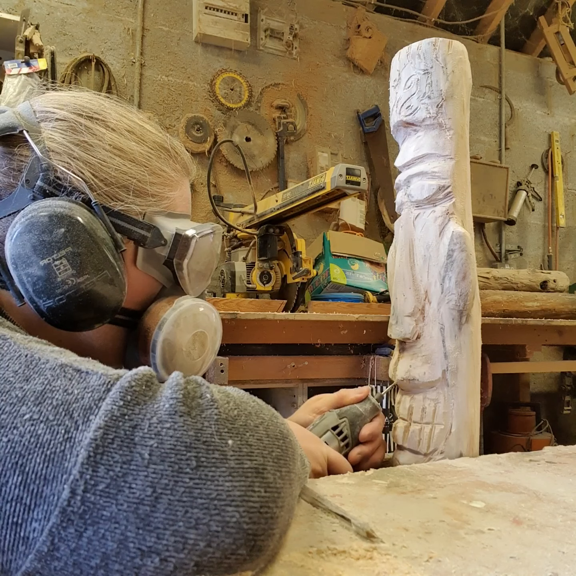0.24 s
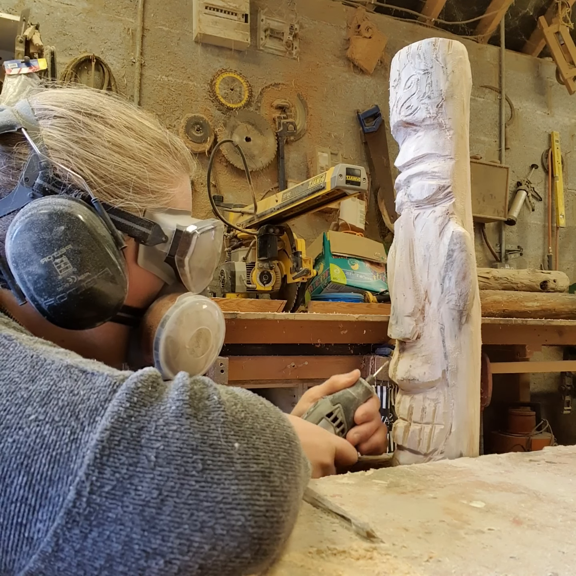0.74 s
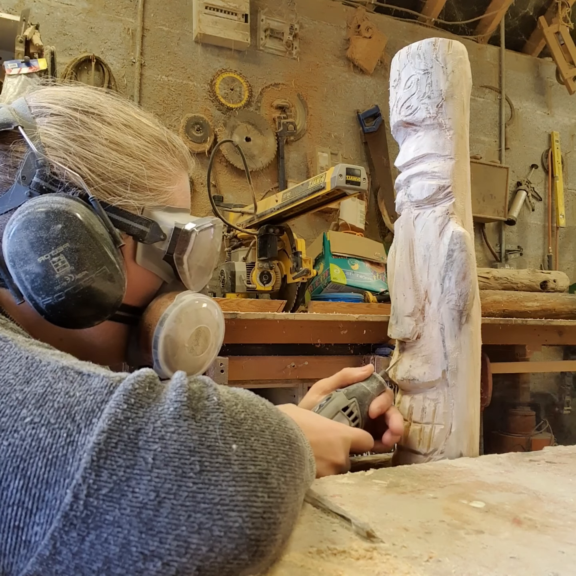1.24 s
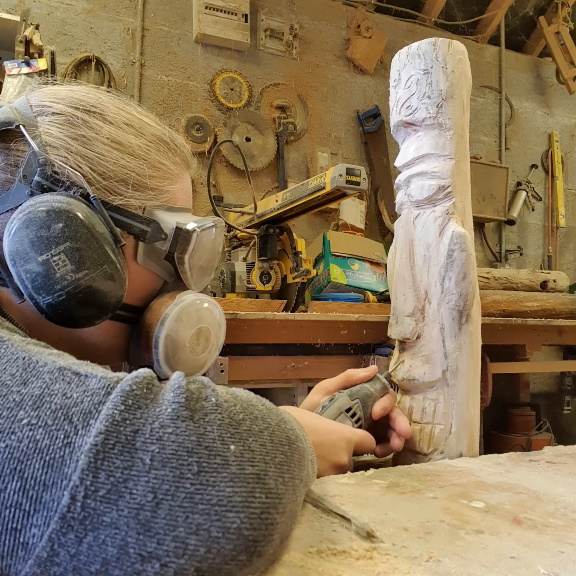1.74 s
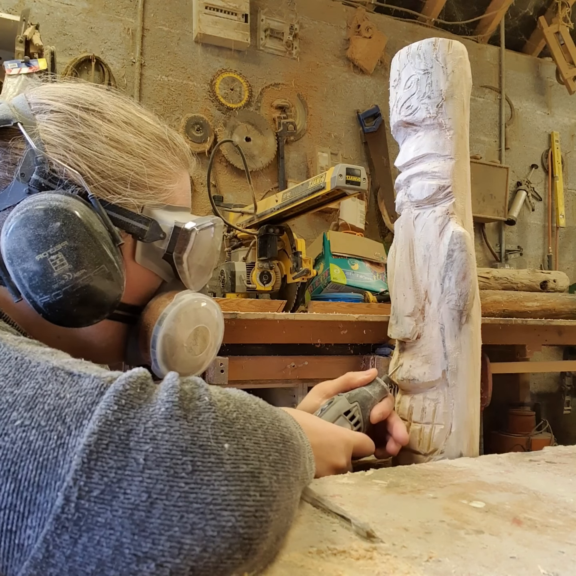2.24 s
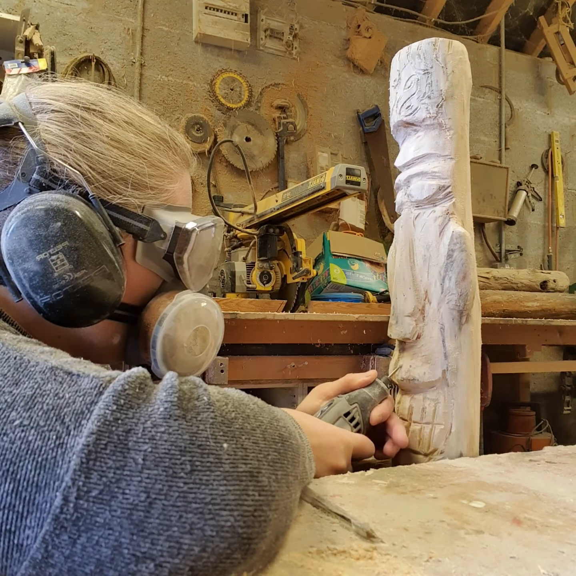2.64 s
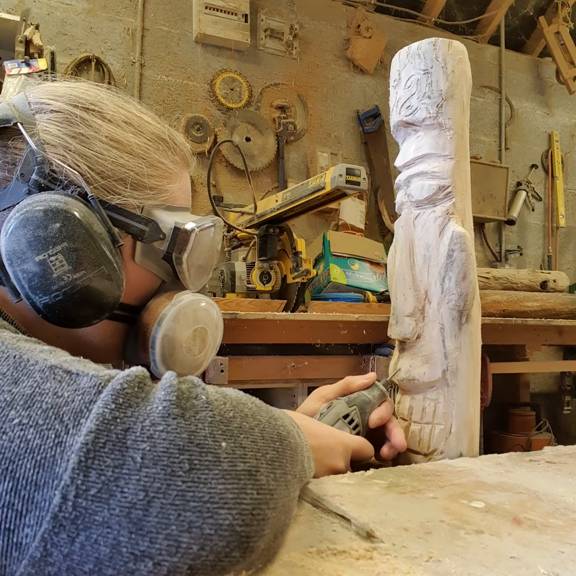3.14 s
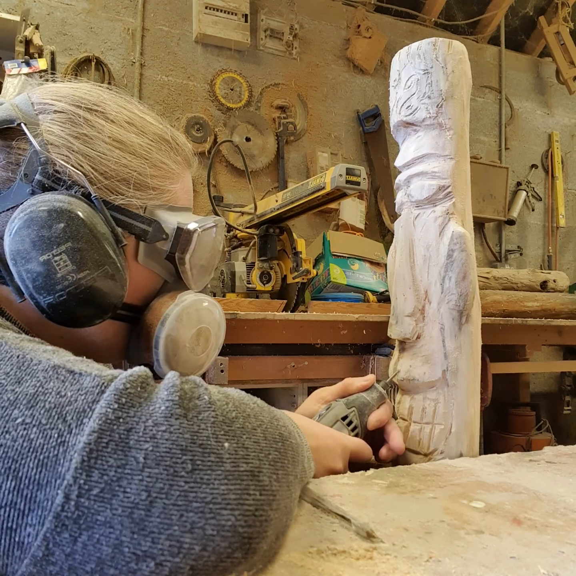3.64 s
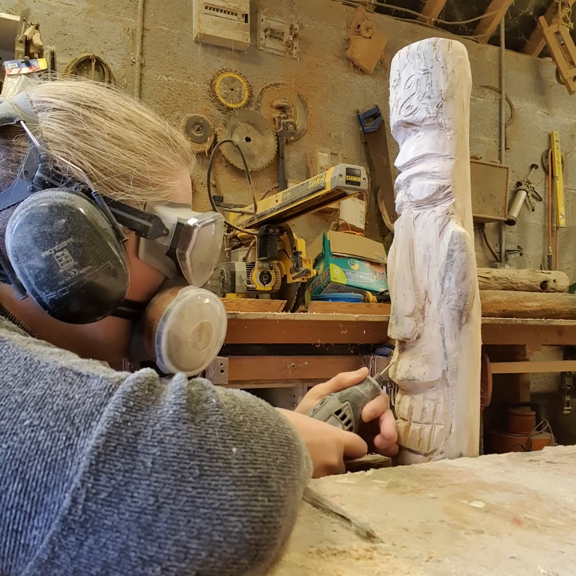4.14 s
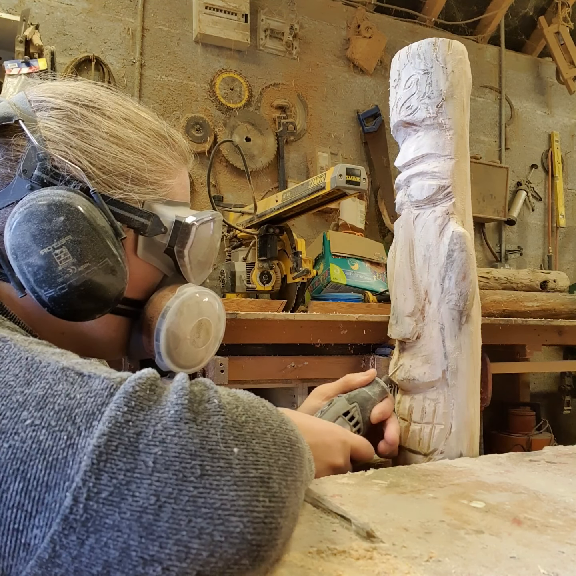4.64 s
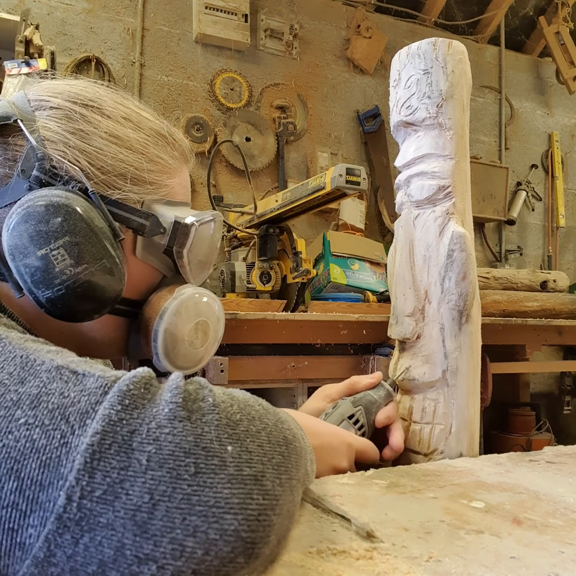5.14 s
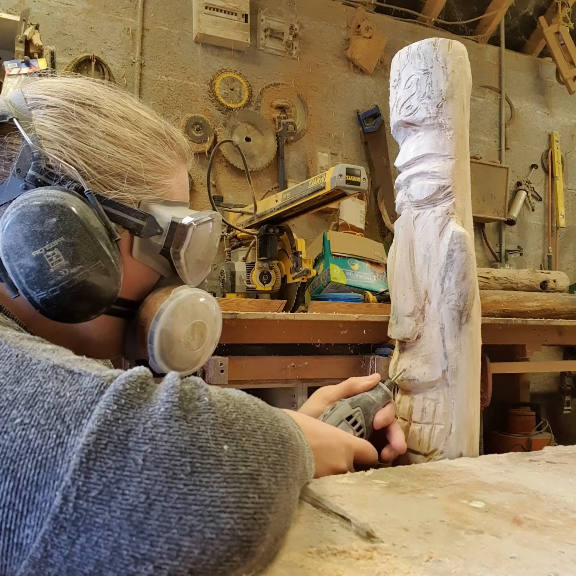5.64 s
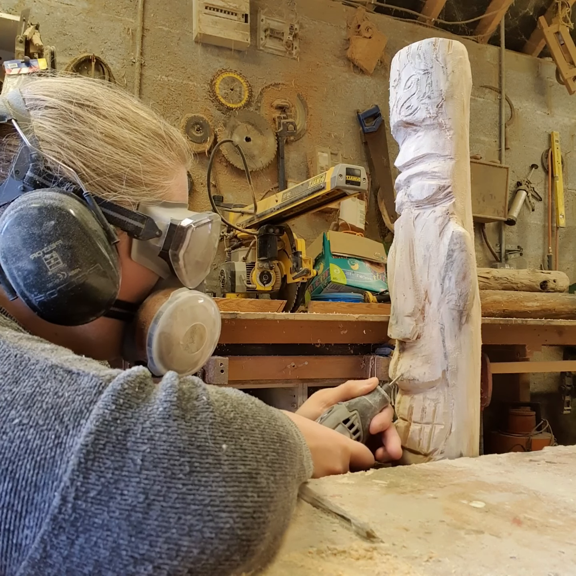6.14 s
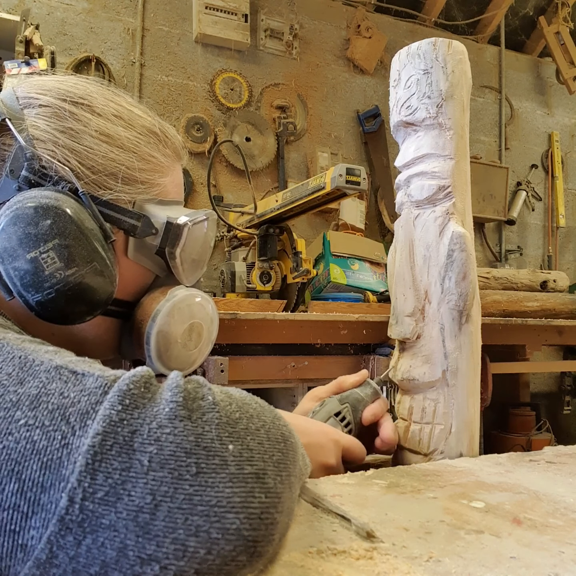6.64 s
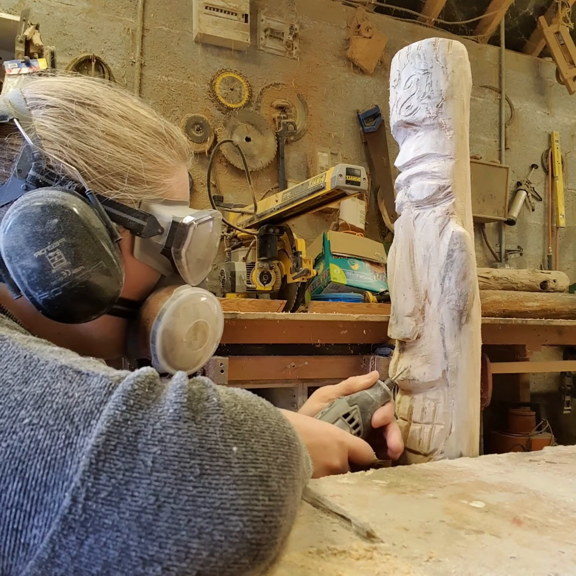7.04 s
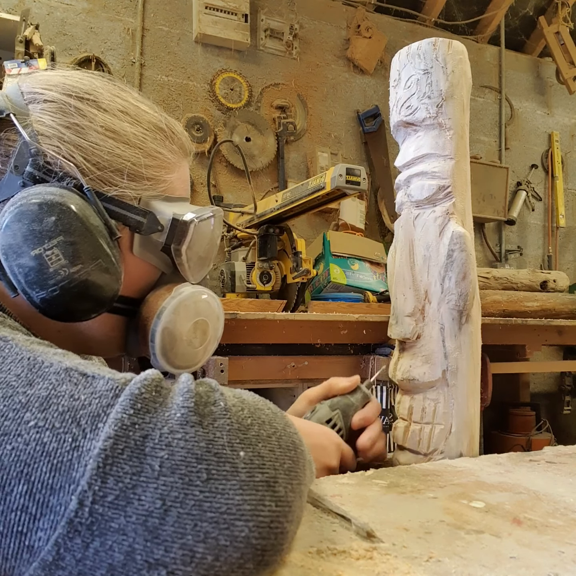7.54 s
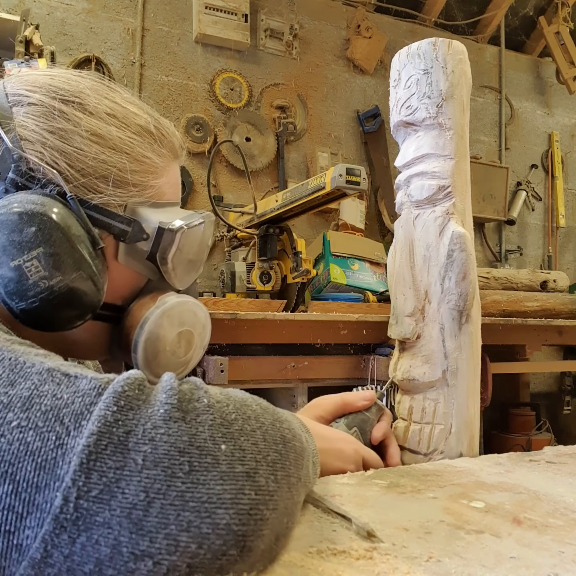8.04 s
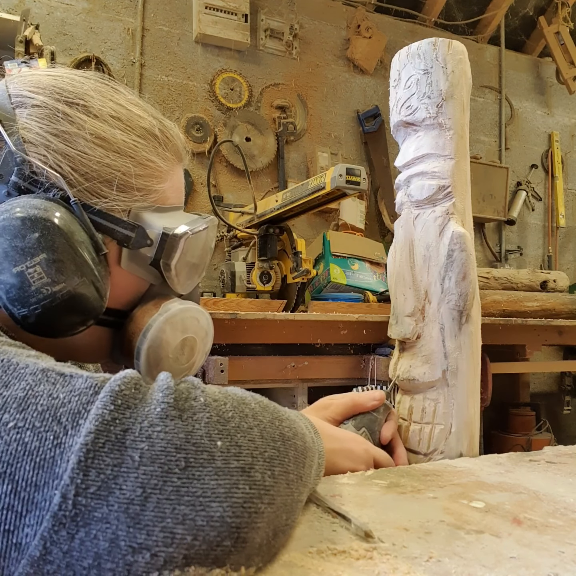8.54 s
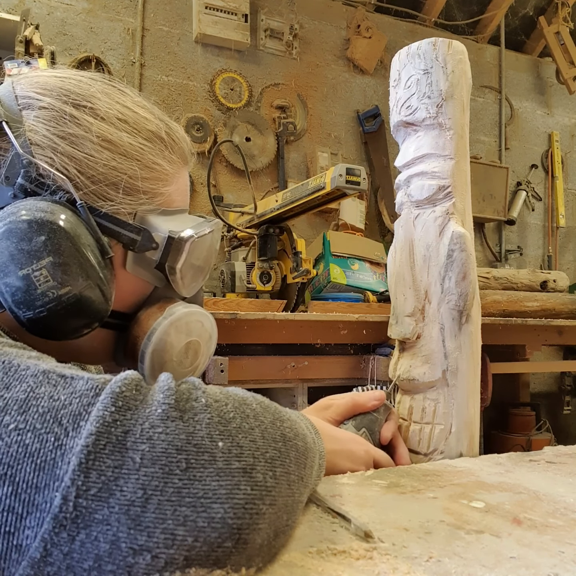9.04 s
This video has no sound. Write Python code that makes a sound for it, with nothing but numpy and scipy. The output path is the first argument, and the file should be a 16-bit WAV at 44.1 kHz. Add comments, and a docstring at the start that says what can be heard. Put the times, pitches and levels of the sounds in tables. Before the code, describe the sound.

A small electric rotary tool runs continuously at close range in a workshop. It begins on a brief cut, runs free with a clear whine and airy hiss, then presses into wood for a long stretch, sagging slightly in pitch with raspy chatter and hum. It recovers, cuts again, spins free and ends with short touches. Stereo, little room tail.

```python
"""Rotary tool carving a wooden post

A mains rotary hand tool turns at about 23000 rpm in a workshop and carves a post in several strokes.
Running free, its bearing sings, its commutator buzzes with the mains pulses and air hisses from the vents.
Pressed into the wood it slows down, the bit chatters on multiples of the shaft rate and the post hums along.
Tones are sines locked to one shaft angle; air and tearing fibres are filtered noise; a short room tail follows."""
import sys
import numpy as np
from scipy import signal
from scipy.fft import rfft, irfft
from scipy.io import wavfile
from scipy.ndimage import uniform_filter1d

SR = 44100
rng = np.random.default_rng(int(sys.argv[2]) if len(sys.argv) > 2 else 0)


def output_pcm(signal):
    """Save a mono or channel-first signal as 16-bit PCM at the path in sys.argv[1].

    Samples are clipped to [-1, 1] before scaling.
    """
    pcm = np.clip(np.atleast_2d(signal).T, -1, 1) * 32767
    wavfile.write(sys.argv[1], SR, np.round(pcm).astype(np.int16))


N = 410130
TIME = np.arange(N) / SR
PULSE_HZ = 100  # bursts of motor current, one per mains half wave
PORT_LAG_S = 5.2e-5  # how much later sound reaches the left microphone port


def undb(db):
    """Decibels to gain."""
    return 10 ** (np.asarray(db) / 20)


def curves(table):
    """The columns of a table as lines over time."""
    time_s, *columns = np.transpose(table)
    return [np.interp(TIME, time_s, column) for column in columns]


def over_hz(table, hz):
    """Read (frequency, value) points on a log-frequency axis."""
    points_hz, values = np.transpose(table)
    return np.interp(np.log(hz + 1), np.log(points_hz), values)


def walk(rate):
    """Smooth chance with about `rate` turns a second and spread 1."""
    width = max(int(SR / rate), 2)
    drift = rng.standard_normal(N)
    for _ in range(2):
        drift = uniform_filter1d(drift, width, mode="wrap")
    return drift / drift.std()


def line(turns, order, hz, pan_db=0, flutter_db=1.5, slip=.1, flutter_rate=45, detour=0):
    """One multiple of the shaft rate, rms 1 before flutter; it slips in phase and reaches the left port later.
    Reflections from the post and bench add `detour` radians to that lag; `pan_db` is left minus right."""
    phase = 2 * np.pi * (order * turns + rng.random()) + slip * walk(flutter_rate)
    size = np.sqrt(2) * undb(flutter_db * walk(flutter_rate))
    pan = undb(np.array([[pan_db], [-pan_db]]) / 2)
    pan = pan / np.sqrt(np.mean(pan ** 2))
    lag = 2 * np.pi * order * hz.mean() * PORT_LAG_S + detour
    tones = np.array([np.sin(phase + lag * side) for side in (-.5, .5)])
    return size * pan * tones


def mains_pulses(width):
    """The speed control lets one burst of current through every half wave; peak 1, width in half waves."""
    return np.exp(-.5 * (((TIME * PULSE_HZ) % 1 - .5) / width) ** 2)


# Shaft speed before its small random wander: time_s, shaft_rate_hz
SHAFT_SPEED = [(0.0, 375), (0.05, 371.2), (0.57, 382.5), (0.85, 383.9), (1.14, 381.9), (1.19, 384),
               (1.32, 382.1), (1.6, 384.8), (1.89, 378.6), (1.97, 374.7), (2.17, 370.7), (2.25, 366.4),
               (2.51, 366.8), (2.64, 365.0), (2.72, 361.4), (3.13, 360), (3.21, 357.7), (3.39, 358.3),
               (3.44, 361.7), (3.62, 358.2), (3.83, 363.4), (3.91, 370), (3.96, 376.9), (4.04, 382.6),
               (4.22, 383), (4.4, 383), (4.77, 384), (4.82, 387.5), (5.05, 380.7), (5.2, 373.4),
               (5.36, 372.2), (5.52, 376.4), (5.57, 373.7), (5.77, 358.8), (5.85, 356.7), (5.96, 358.1),
               (6.06, 363), (6.22, 361), (6.4, 348), (6.45, 349.5), (6.5, 352.8), (6.63, 378.7),
               (6.71, 385.4), (7.07, 386.0), (7.43, 382.6), (8.31, 385.4), (8.78, 374.5), (9.09, 381.8),
               (9.14, 381.1), (9.3, 375.2)]


def shaft():
    """The one rotation that drives every layer: its rate in Hz and its angle in turns."""
    hz = curves(SHAFT_SPEED)[0] * (1 + 0.000739 * walk(19.4))
    return hz, np.cumsum(hz) / SR


FREE_HZ, SAG_HZ = 384.3, 20.7  # shaft rate out of the wood; the drop at which the motor labours
BEARING_ORDER = 4.92  # bearing song, in multiples of the shaft rate
# Base level running free, change when labouring, change with the tip turned to the wood: all dB
BEARING, BUZZ, WHISTLE = (-30.5, -13.5, -2.2), (-35.5, 1.3, -3.5), (-34, -5.5, -0.92)
# Angle of the tool on the wood: time_s, tip_share (0 = flank .. 1 = tip)
TOOL_ANGLE = [(0, 0.16), (7.4, 0.041), (7.9, 0.98), (9.3, 1)]
# Level changes as the hand turns the motor and its vents:
# time_s, bearing_db, buzz_db, whistle_db, low_air_db, rush_treble_db
HAND_FACING = [(0, -3, -2, -2, 3.5, -2.5), (.6, -2, -3.5, -1, 2.5, 0.5), (.95, 1, -2, 3, 4.5, 2.5),
               (1.4, 5, 5, -3, 3, 4.7), (1.75, 2.5, -1, 1.5, 3.5, 3.5), (2.2, -1, -2, -1.5, 2, 1),
               (2.95, 0.5, 2.5, 1, 2.5, 1), (3.7, 0.5, -2, 0.5, 2, -1), (4.15, 0.5, 0, 0.5, 1.2, -0.5),
               (4.6, 0.5, 1, -0.5, 2.5, 0.5), (5.05, 1, 1, 2, 2, 2), (5.55, 1, 1, 7.5, 3.5, 2.2),
               (5.9, -3, 0, -8, 4, -.7), (6.5, -1, -0.5, -6, 0.7, -0.8), (7.05, 1.5, 0, -4, 2.3, -0.2),
               (7.5, -.5, -0.5, 0.5, 1, 0.5), (7.7, 0, -2.5, -2, .5, -1.5), (8.4, -0.5, -1.5, -1, 4.5, 1),
               (9.3, -3, -2.5, 2.5, 4, -0.5)]


def motor(turns, hz, load):
    """The bearing sings just under the 5th multiple; eight commutator bars buzz with each burst of current."""
    labour = np.tanh(np.maximum(FREE_HZ - hz, 0) / SAG_HZ)
    tip = curves(TOOL_ANGLE)[0]
    tone_levels = [undb(free_db + labour * labour_db + tip * tip_db)
                   for free_db, labour_db, tip_db in (BEARING, BUZZ, WHISTLE)]
    bearing, buzz, whistle = undb(curves(HAND_FACING)[:3]) * tone_levels
    current = mains_pulses(width=.085) * undb(1.4 * walk(150))
    current = current / current.mean()
    depth = .48 + .22 * load
    pulsing = 1 - depth + depth * current
    # under load the mains pulse rate twists the rotor slightly to and fro
    twisted = turns + 0.0073 * load * np.sin(2 * np.pi * PULSE_HZ * TIME)

    out = bearing * line(turns, BEARING_ORDER, hz, pan_db=0.5, flutter_db=1.1, slip=.07, detour=0.9)
    out += buzz * pulsing * line(twisted, 8, hz, pan_db=1.0, flutter_db=1.25, slip=.11,
                                 flutter_rate=39, detour=-0.029)
    whistle = whistle * (0.82 + 0.065 * current)
    out += whistle * line(turns, 24, hz, pan_db=2.5, flutter_db=2.3, slip=0.18, detour=1.21)
    # faint 32nd multiple, weaker still under load
    out += undb(-45 - 11 * load) * line(turns, 32, hz, pan_db=-3.5, flutter_db=1.5, slip=.35, detour=-2.1)
    return out


# Strokes of the bit; one may run into the next. Levels are before grain, resonance and grip:
# start_s, end_s, ease_in_s, release_s, bite_db, drone_db (shaft rate), fifth_db (5th multiple),
# chatter_db (6th), seventh_db (7th), eleventh_db (11th), whine_db (12th), squeal_db (36th)
CUTTING_STROKES = [(0, .33, 0.0044, 0.083, -29, -28.5, -37.5, -28, -40, -46, -55, -65),
                   (1.6, 1.78, .15, 0.081, -35.5, -32.5, -25.5, -32, -50, -45, -42, -65),
                   (1.772, 2.04, .1, 0.15, -30.5, -24.5, -30.5, -23.5, -38, -37, -30, -65),
                   (2.059, 2.3, 0.12, 0.083, -26.5, -34.5, -33.5, -22.5, -43, -41, -42, -65),
                   (2.3, 2.523, 0.07, .1, -26.5, -33, -37, -25, -43, -31, -28, -65),
                   (2.521, 2.75, .1, 0.057, -26, -30.5, -48, -30, -36, -32, -24.5, -62),
                   (2.75, 3.155, 0.063, 0.096, -25.5, -29, -40, -25, -33, -30, -30.5, -58),
                   (3.161, 3.561, 0.081, 0.067, -26.5, -30.5, -38.5, -21.5, -33, -25, -24, -49),
                   (3.568, 3.82, 0.049, 0.11, -26, -31, -46, -28.5, -39, -30, -32, -47),
                   (3.87, 3.931, .04, .06, -36, -45, -38, -25.5, -55, -50, -50, -65),
                   (4.928, 5.139, .13, 0.047, -32.5, -27, -28, -23.5, -38, -40, -29.5, -65),
                   (5.145, 5.21, 0.043, 0.038, -32, -27, -24, -23, -35, -41, -42, -65),
                   (5.213, 5.297, 0.053, 0.15, -35, -23.5, -42, -25.5, -42, -42, -30, -65),
                   (5.379, 5.602, 0.14, 0.083, -33.5, -23.5, -31.5, -22, -38, -38, -37, -65),
                   (5.587, 5.973, 0.12, 0.088, -26.5, -27.3, -38, -24.5, -32, -30, -27.5, -58),
                   (5.979, 6.22, .09, 0.097, -28, -27, -34, -18, -30, -30, -34, -60),
                   (6.221, 6.481, .12, 0.078, -30, -23.5, -54, -25.5, -43, -31, -25, -54),
                   (6.52, 6.59, 0.032, .035, -30.5, -38, -48, -25, -48, -37, -31, -62),
                   (8.442, 8.599, .02, 0.049, -35.5, -38, -42, -28, -48, -35, -50, -65),
                   (8.609, 8.809, 0.042, .05, -30.5, -36, -50, -22, -46, -30, -30, -60),
                   (9.06, 9.302, 0.029, .05, -32, -38.5, -42, -24.5, -48, -33, -39, -62)]


def strokes():
    """Each stroke eases in, holds and lets go; gives the gain of every cutting tone over time."""
    out = 0
    for start, end, ease_s, release_s, *levels_db in CUTTING_STROKES:
        press = np.clip((TIME - start) / max(ease_s, .005), 0, 1)
        let_go = np.clip(1 - (TIME - end) / max(release_s, .005), 0, 1)
        out = out + np.outer(undb(levels_db), press * let_go)
    return out


# Spells when the bit bounces on hard grain:
# start_s, end_s, whine_dip (0-1), chatter_dip (0-1)
GRAIN_SKIPS = [(0, .36, 0.4, .5), (5.04, 5.58, 0.58, 0.81), (5.902, 6.26, .45, 0.05),
               (6.26, 6.554, 0.72, 0.4), (8.44, 9.3, 0.55, 0.33)]


def grip(depths, loose):
    """Gain of a tone whose bit loses hold for a few milliseconds at a time; mean about 1."""
    depth = 0
    for (start, end, *_), share in zip(GRAIN_SKIPS, depths):
        depth = depth + share * ((TIME > start) & (TIME < end))
    depth = uniform_filter1d(np.clip(depth, 0, 1), SR // 50)
    return (1 - depth * loose) / (1 - depth * loose.mean())


GRAIN_DB, GRAIN_RATE = 1.2, 13  # hard and soft grain sway the tones of a stroke; changes a second
RING_HZ, RING_WIDTH_HZ = 2168, 92  # the resonance that the chatter sweeps through
# Base levels out of the wood: 1st, 5th, 11th and 12th multiple
FREE_DRONE_DB, FREE_FIFTH_DB, FREE_ELEVENTH_DB, FREE_WHINE_DB = -39.5, -42.5, -46, -35
WHINE_FOLLOW = 0.88  # share of the bearing's swell that the free whine follows
WHINE_TIP_DB = -1  # change of the free whine with the tip turned to the wood
# Weaker shaft lines, cuts relative to the bite and base levels running free:
# multiple, free_db, flank_cut_db, tip_cut_db, left_minus_right_db
WEAK_OVERTONES = [(2, -59, -11, -15.5, -6.5), (3, -43.5, -22.5, -18, -23), (4, -71, -22.5, -24, 31),
                  (9, -50, -18.5, -16, 6), (10, -68, -15.5, -5.5, -1), (13, -48.5, -26, -8.5, 12),
                  (14, -52, -32, -28, -8), (15, -48.5, -23.5, -15, 11), (16, -58, -17.5, -16, 14),
                  (17, -52, -45, -15, 13), (18, -50.5, -38, -16, 14), (23, -60, -34, -28, 6),
                  (25, -52, -40, -10, 21), (26, -71, -34, -24, 13), (28, -63, -24, -30, -12),
                  (33, -48, -30, -28, -10)]


def bit(turns, hz, bite, load, drone, fifth, chatter, seventh, eleventh, whine, squeal):
    """The bit strikes the wood alike on every turn; its angle picks the overtones, the grain unsteadies them."""
    tip = np.clip(curves(TOOL_ANGLE)[0], 0, 1)
    loose = .5 + .5 * np.tanh(4 * (walk(120) - .7))  # near 1 in brief random moments
    held, chatter_held = (grip(depths, loose) for depths in np.transpose(GRAIN_SKIPS)[2:])

    chatter, eleventh, whine = (tone * undb(GRAIN_DB * walk(GRAIN_RATE))
                                for tone in (chatter, eleventh, whine))
    chatter = chatter / np.hypot(1, 2 * (6 * hz - RING_HZ) / RING_WIDTH_HZ)
    # cutting and free-running levels add as powers
    drone = np.hypot(drone, undb(FREE_DRONE_DB))
    fifth = np.hypot(fifth, undb(FREE_FIFTH_DB))
    eleventh = np.hypot(eleventh, undb(FREE_ELEVENTH_DB))
    free_whine_db = FREE_WHINE_DB + WHINE_FOLLOW * curves(HAND_FACING)[0] + WHINE_TIP_DB * tip
    whine = np.hypot(whine, undb(free_whine_db))

    out = drone * line(turns, 1, hz, pan_db=-4, flutter_db=0.83, slip=0.033, detour=-0.94)
    out *= 1 + 0.088 * np.sin(2 * np.pi * PULSE_HZ * TIME)  # torque ripple
    out += fifth * line(turns, 5, hz, pan_db=5, flutter_db=1.1, slip=0.08, detour=0.85)
    chatter = chatter * chatter_held
    out += chatter * line(turns, 6, hz, pan_db=6.0, flutter_db=1.44, slip=0.14, detour=-0.13)
    out += seventh * line(turns, 7, hz, pan_db=-1, flutter_db=1.5, slip=.13)
    # turning the tool changes the path of this tone to the two ports
    eleventh_detour = 0.2 + 1.1 * tip
    out += eleventh * held * line(turns, 11, hz, pan_db=4.0, flutter_db=2.0, slip=0.18, detour=eleventh_detour)
    out += whine * held * line(turns, 12, hz, pan_db=-2.5, flutter_db=2.0, slip=0.19, detour=0.14)
    out += squeal * line(turns, 36, hz, pan_db=6, flutter_db=6, slip=.9, flutter_rate=300)

    for order, free_db, flank_db, tip_db, pan_db in WEAK_OVERTONES:
        cutting = held * bite * undb(flank_db + tip * (tip_db - flank_db))
        size = np.hypot(undb(free_db - 2.4 * load), cutting)
        flutter_db, slip = min(0.26 * order, 2.3), 0.026 * min(order, 10)
        out += size * line(turns, round(order), hz, pan_db, flutter_db=flutter_db, slip=slip)
    return out


# Middle band: level, rise under load, share of the treble's swell
RASP_DB, RASP_LOAD_DB, RASP_FOLLOW = 1.06, 1.5, 0.6
# Rushing sound before the bands swell: frequency_hz, density_db (dB per Hz)
AIR_SPECTRUM = [(30, -107), (65, -82), (150, -85), (220, -80), (280, -75), (450, -75), (850, -69.5),
                (1200, -70), (1600, -74.5), (2200, -68), (4500, -69), (6500, -72), (8300, -75.5),
                (10500, -71), (14200, -78)]
# Share of the rush that both microphone ports hear alike: frequency_hz, share (0-1)
PORT_LIKENESS = [(100, 0.82), (600, 0.85), (1400, 0), (3000, 0.59), (6000, 0.51), (13000, 0.06)]


def rush(turns, load):
    """Air leaves the vents and fibres tear: three broad noise bands, the upper two pulsing with the turns."""
    hz = np.arange(N // 2 + 1) * SR / N
    common, left, right = rfft(rng.standard_normal((3, N)))
    alike = np.clip(over_hz(PORT_LIKENESS, hz), 0, 1)
    lag = np.exp(-2j * np.pi * hz * PORT_LAG_S)
    shared = np.array([common * lag, common])
    separate = np.array([left, right])
    ports = np.sqrt(alike) * shared + np.sqrt(1 - alike) * separate
    ports *= undb(over_hz(AIR_SPECTRUM, hz)) * np.sqrt(SR / 2)

    below_rasp = 1 / (1 + (hz / 1900) ** 6)
    below_hiss = 1 / (1 + (hz / 6500) ** 6)
    bands = (below_rasp, below_hiss - below_rasp, 1 - below_hiss)
    air, rasp, hiss = (irfft(ports * share, N) for share in bands)

    air_db, hiss_db = curves(HAND_FACING)[3:]
    rasp_db = RASP_DB + RASP_LOAD_DB * load + RASP_FOLLOW * hiss_db
    tearing = 1 + (0.088 + 0.21 * load) * np.sin(2 * np.pi * turns)
    sparking = 1 + 0.072 * mains_pulses(width=0.083)
    out = air * undb(air_db + 1.15 * walk(12))
    out += rasp * tearing * undb(rasp_db + .5 * walk(30))
    out += hiss * tearing * sparking * undb(hiss_db - 1.04 + 0.88 * walk(30))
    return out


# Mains vibration passed into the post: frequency_hz, level_db (relative to the 100 Hz hum)
POST_HUM = [(100, 0), (200, -17), (300, -1), (400, -11)]


def hum(load):
    """The post and bench hum with the motor's mains vibration and rumble faintly while the bit touches."""
    tones = sum(undb(db) * np.sin(2 * np.pi * (hz * TIME + rng.random())) for hz, db in POST_HUM)
    rumble_band = signal.butter(2, [35, 140], "bandpass", fs=SR, output="sos")
    rumble = signal.sosfilt(rumble_band, rng.standard_normal(N))
    post = undb(-38.5) * tones + undb(-54.5) * rumble / rumble.std()
    return load * post * undb([[-1.2], [1.2]])  # a little stronger on the right


def workshop(x, room_db, t60_s):
    """Shelves and walls return a short diffuse tail, different at each port."""
    t = TIME[:SR // 2]
    tail = rng.standard_normal((2, len(t))) * undb(-60 * t / t60_s) * (t > .004)
    tail /= np.sqrt(np.sum(tail ** 2, axis=1, keepdims=True))
    return x + undb(room_db) * signal.fftconvolve(x, tail, axes=1)[:, :N]


def scene():
    """One shaft drives motor, bit and rush; the load rises with the bite."""
    hz, turns = shaft()
    bite, *partials = strokes()
    load = np.tanh(bite / undb(-27))
    tool = motor(turns, hz, load) + bit(turns, hz, bite, load, *partials)
    return workshop(tool, room_db=-19, t60_s=.3) + rush(turns, load) + hum(load)


def record(dry):
    """A steep elliptic low-pass cuts the top above 14550 Hz."""
    return signal.sosfilt(signal.ellip(12, .1, 90, 14550, fs=SR, output="sos"), dry)


dry = scene()
out = record(dry)
output_pcm(out)
```